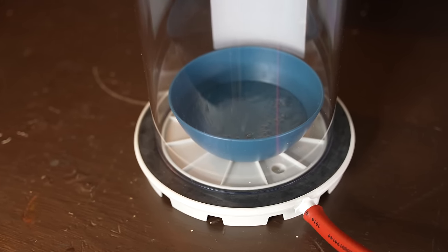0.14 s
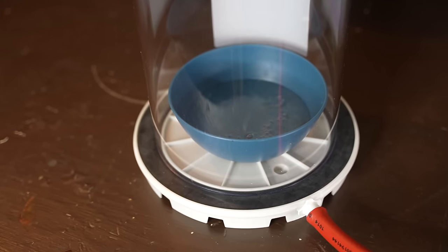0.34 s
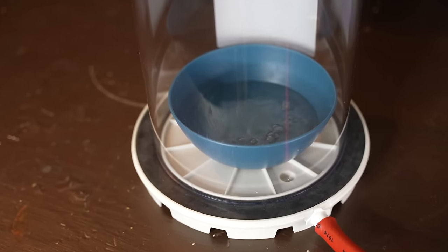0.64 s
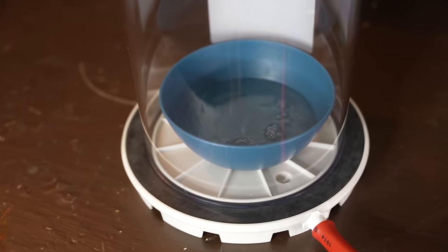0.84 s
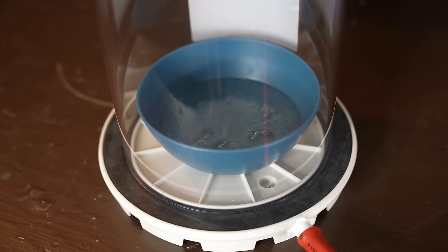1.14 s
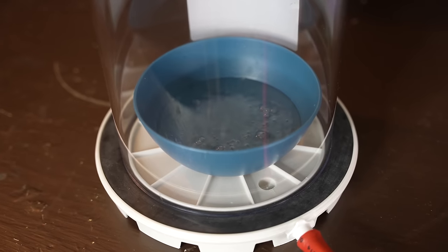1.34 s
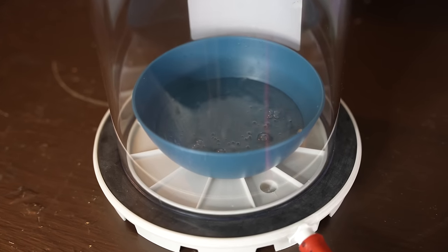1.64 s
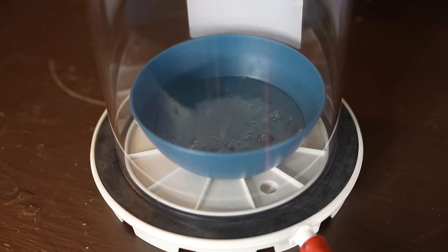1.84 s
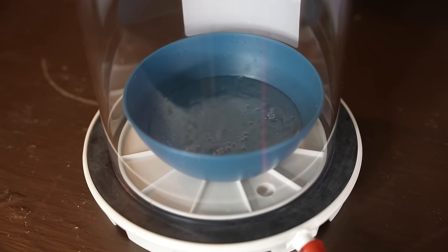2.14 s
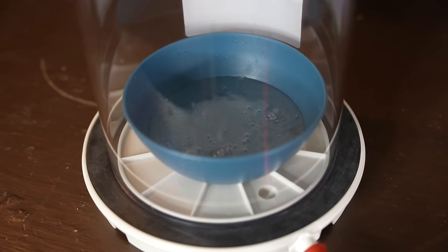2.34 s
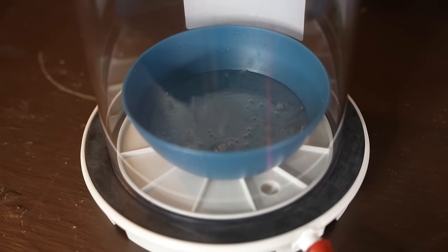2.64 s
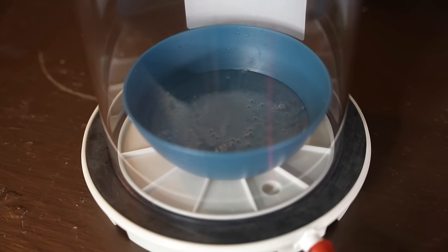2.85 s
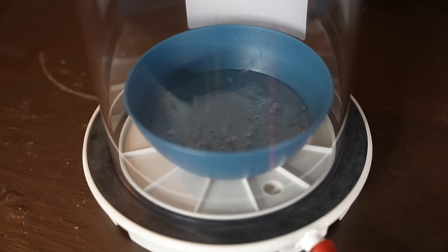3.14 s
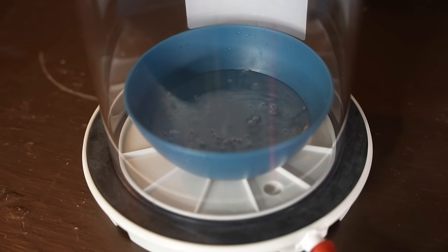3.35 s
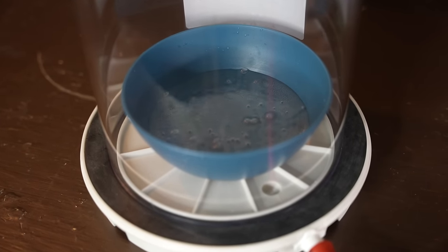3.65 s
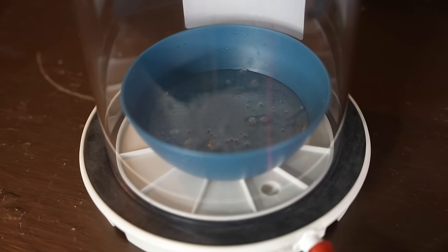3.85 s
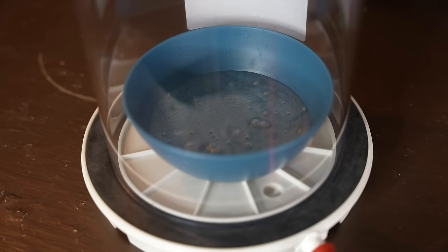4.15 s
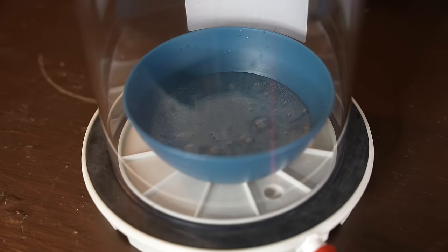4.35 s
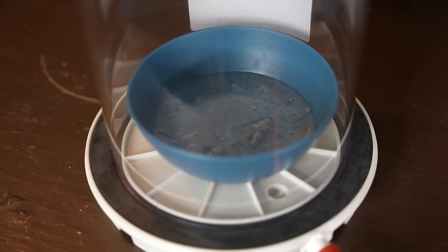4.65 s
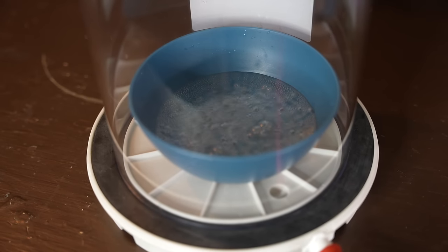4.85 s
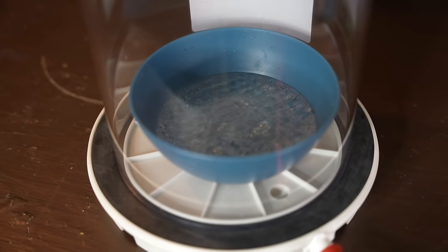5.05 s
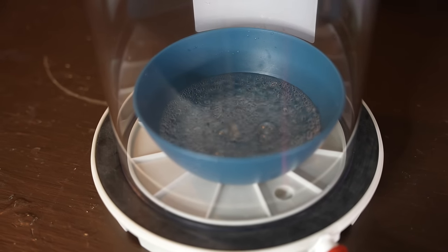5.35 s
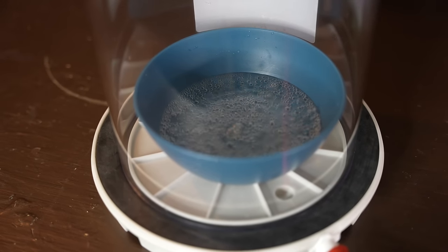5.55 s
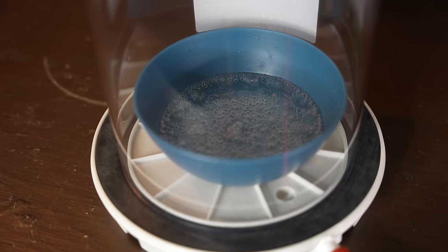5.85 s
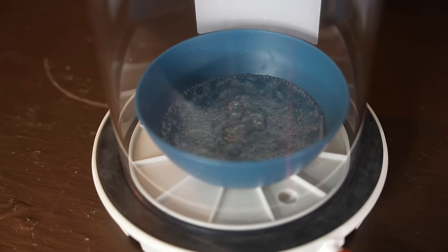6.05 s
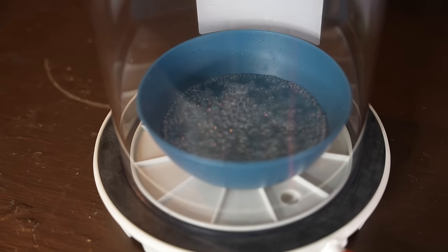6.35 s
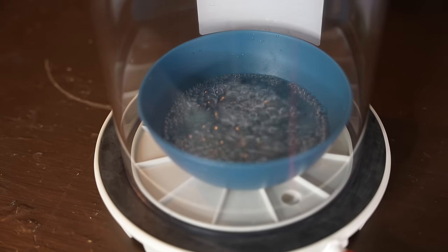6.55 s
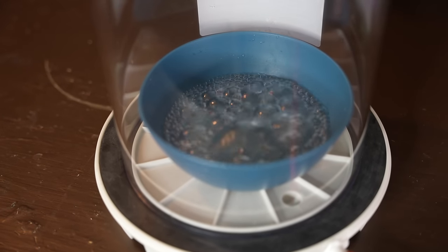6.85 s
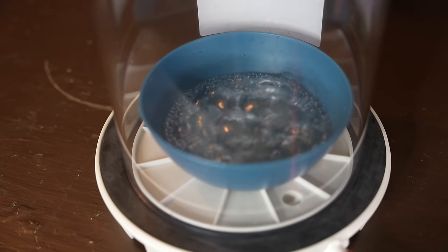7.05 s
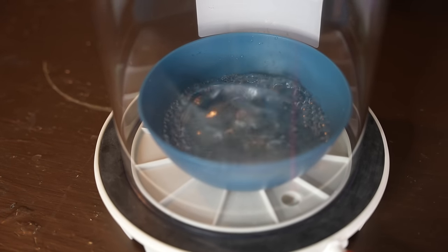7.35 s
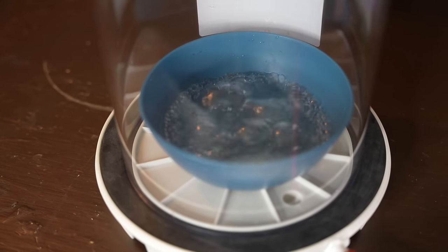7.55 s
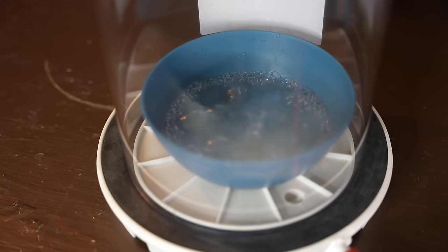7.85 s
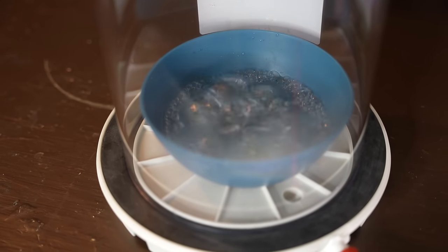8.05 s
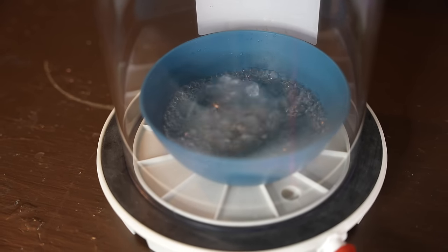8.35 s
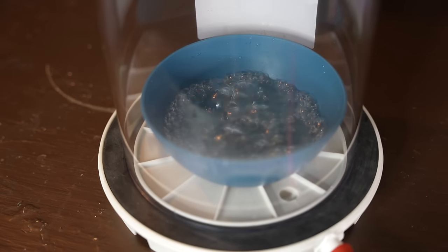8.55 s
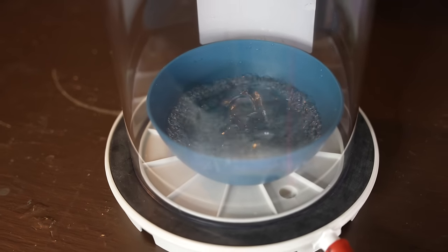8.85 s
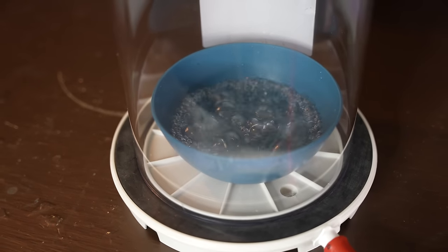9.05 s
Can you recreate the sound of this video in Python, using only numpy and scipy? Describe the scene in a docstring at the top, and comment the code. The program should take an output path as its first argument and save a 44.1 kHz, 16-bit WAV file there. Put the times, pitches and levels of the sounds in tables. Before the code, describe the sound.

A rotary vacuum pump runs continuously on a workbench, close by in a small dry workshop. Its rapid knocks, almost sixty a second, merge into a hard mid-pitched rattle over low hum and oily hiss. Air spits briefly at first; around four seconds the knock strengthens and sharp metallic clacks cluster, then uneven clatter continues to the end.

```python
"""A low hum and a knock, two vane strokes a turn, ring from a rotary vane vacuum pump on a workbench.
The hum is a stack of shaft orders; the knock is oil-cushioned blows through the housing's resonances.
As the bell jar empties the knock grows uneven, and noise-driven steel modes clatter harder on the whole.
Hard valve clacks stand out, air spits as sliding bands of noise, and churned oil hisses underneath."""
import sys
import numpy as np
from scipy import signal
from scipy.fft import rfft, irfft, next_fast_len
from scipy.io import wavfile
from scipy.ndimage import uniform_filter1d, map_coordinates

SR = 44100
rng = np.random.default_rng(int(sys.argv[2]) if len(sys.argv) > 2 else 0)


def transcribe(signal):
    """Save signal, clipped to [-1, 1], as a 16-bit WAV file at the path in sys.argv[1]."""
    frames = np.atleast_2d(signal).T
    limited = np.clip(frames, -1, 1)
    pcm = np.round(limited * 32767).astype(np.int16)
    wavfile.write(sys.argv[1], SR, pcm)


N = 405719  # length [samples]

# Levels are balances inside the mix, ahead of the microphone.
# vane strokes, two a turn: (time [s], rate [Hz])
STROKE_RATE = [(0, 58.42), (1.5, 58.6), (4, 58.64), (9.2, 58.76)]
# how far the jar is emptied: (time [s], vacuum [0-1])
VACUUM_REACHED = [(0, 0), (1, .25), (2.5, .5), (4.2, .8), (6.5, .95), (9.2, 1)]
# shaft and vane orders: (multiple of stroke rate, level moving air [dB], in thin air [dB], near vacuum [dB])
HUM_ORDERS = [(1, -41.5, -41.5, -42.5), (2, -38.5, -44.5, -45), (2.5, -57.5, -52.5, -62),
              (3, -54, -41.5, -40.5), (4, -54.5, -53, -61.5), (5, -43, -58, -52), (5.5, -45, -55, -57),
              (6, -52.5, -43, -51), (6.5, -45, -51, -55), (7, -50, -52, -56), (8, -42.5, -52.5, -60),
              (8.5, -48, -51, -56), (9, -52, -44.5, -46), (9.5, -45, -48, -54), (10, -42, -43.5, -48),
              (11, -41.5, -56, -59), (12.5, -51, -44.5, -51), (13.5, -47, -44.5, -48), (14, -47, -47, -52),
              (14.5, -48, -47, -47)]
# resonances of the pump housing and its panels: (frequency [Hz], width [Hz], level [dB])
HOUSING_MODES = [(965.9, 30.2, 0), (1218.4, 11.9, 4.5), (1029.7, 72, -6.5), (1066, 216, -8),
                 (1101.4, 33, -5.5), (1635, 16, -8.5)]
# resonances of the valve and vane steel: (frequency [Hz], width [Hz], level [dB])
STEEL_MODES = [(2090, 60, -14), (2340, 75, -7), (2500, 60, -8), (2720, 90, -10), (2950, 60, -9.5),
               (3250, 48, -12), (3460, 60, -5.5), (3980, 40, -3.5), (4320, 85, 4.5), (4430, 120, -6),
               (4600, 60, -9), (4870, 70, -12), (5450, 200, -17), (6530, 80, -15), (8600, 150, -12.5),
               (9050, 120, -16), (9450, 80, -13), (10050, 200, -23), (13300, 150, -28)]
# the hardest valve clacks: (time [s], relative peak [dB], treble tilt above 5 kHz [dB])
HARD_CLACKS = [(1.003, -22, -10), (3.988, -12, -5), (4.0711, -14.5, -6), (4.124, -12, -6),
               (4.2955, -11, -3), (4.4278, -12, -7), (4.636, -10, -8), (4.82, -15, -9), (5.127, -14.5, -5),
               (5.297, -18, -2), (5.775, -19, 0), (6.0136, -10.5, 4), (6.27, -29, -9), (6.9504, -12.5, -1),
               (7.375, -21, 4)]
# colour of churned oil and air: (frequency [Hz], relative level [dB])
CHURN_COLOUR = [(25, -42), (150, 0), (300, -5.5), (450, 2.5), (800, 5.5), (1250, 18), (1550, 0),
                (3000, -7.5), (5500, -10), (7300, -11.5), (9800, -8.5), (11500, -17), (15500, -50)]
# colour of each stroke's dull thud: (frequency [Hz], relative level [dB])
THUD_COLOUR = [(100, -0.5), (230, 9), (380, -20), (600, 9), (900, 11), (1350, -25), (1600, -44),
               (3000, -24), (12000, -40)]
# decay of the workshop: (frequency [Hz], t60 [s])
ROOM_DECAY = [(200, .2), (2000, .13), (10000, .12)]
# microphone colour: (frequency [Hz], level [dB])
MIC_COLOUR = [(1250, 0.5), (1450, -6.5), (1700, -2), (5500, -2.5), (7200, -6.5), (8700, -8), (10500, -10.5),
              (13300, -7.5), (15700, -15)]
# resonances of the valve port: (frequency [Hz], width [Hz], level [dB])
PORT_MODES = [(4400, 250, -1), (4950, 220, 0), (5430, 200, 0), (5900, 200, -1), (6530, 90, 1),
              (9480, 200, 10), (13300, 200, -10)]
# knock strength, greatest as the water starts to boil: (time [s], level [dB])
KNOCK_STRENGTH = [(0, -26.7), (3.7, -26.5), (4.4, -23.8), (6.2, -24.8), (8.2, -26), (8.7, -28.2),
                  (9.2, -27)]
# clatter strength between rattles: (time [s], relative level [dB])
CLATTER_STRENGTH = [(0, -45.5), (1, -43.5), (3.8, -41), (4.1, -39.5), (5.7, -40), (6.6, -37), (7.3, -40.5),
                    (9.2, -38.5)]
# the knock falters for a few strokes: (time [s], length [s], depth [dB])
KNOCK_LULLS = [(0.49, 0.028, 9.5), (0.962, 0.036, 6), (1.533, 0.019, 3), (2.01, 0.017, 2), (2.18, 0.03, 2),
               (2.337, 0.015, 0.5), (2.775, 0.04, 2), (3.426, 0.02, 5), (3.926, 0.042, 4.5),
               (4.39, 0.035, 4), (4.779, 0.073, 10), (5.374, 0.022, 13), (5.723, 0.094, 5),
               (6.114, 0.048, 8.5), (6.52, 0.19, 3.5), (7.072, 0.052, 6), (7.267, 0.05, 6),
               (7.566, .025, 4.5), (7.71, 0.064, 11), (8.484, 0.055, 5), (8.759, 0.036, 6.5),
               (8.988, 0.072, 6.5)]
# runs of harder knocks: (time [s], length [s], rise [dB])
KNOCK_SURGES = [(.018, .057, 3.5), (.135, 0.031, 4.5), (1.175, 0.03, 4.5), (1.335, 0.055, 2.5),
                (1.578, 0.03, 5.5), (1.885, 0.062, 4.5), (2.36, 0.082, 3), (2.705, 0.11, 3.5),
                (4.335, 0.074, 2.5), (7.175, 0.072, 3), (7.83, 0.055, 3.5)]
# the valve rattles for a few strokes: (time [s], length [s], rise [dB])
VALVE_RATTLES = [(.025, .055, 6), (.42, 0.024, 7), (.82, 0.046, 5), (1.012, 0.06, 5), (1.55, 0.047, 2.5),
                 (2.065, 0.017, 11), (2.475, 0.016, 6), (2.564, 0.069, 3.5), (2.871, 0.036, 3.5),
                 (2.998, 0.035, 8), (4.324, 0.043, 8), (4.651, 0.051, 8), (4.954, 0.077, 3),
                 (5.154, 0.11, 7), (5.623, 0.035, 7), (5.806, 0.042, 7.5), (6.236, 0.11, 3.5),
                 (6.749, 0.031, 8), (7.005, 0.025, 10), (7.368, 0.064, 10), (7.494, 0.052, 4.5),
                 (7.603, 0.1, 7), (8.137, 0.14, 5), (8.475, 0.028, 10.5), (8.86, 0.068, 5)]
# air spits through the oil: (time [s], length [s], relative level [dB], centre [Hz])
AIR_SPITS = [(0.022, .05, -40, 4970), (0.29, 0.086, -50, 5570), (0.46, 0.087, -46.5, 5200),
             (0.778, 0.047, -41, 5440), (1.008, 0.069, -39.5, 5370), (1.133, 0.053, -38.5, 4700),
             (1.645, 0.026, -38, 5100), (1.712, 0.062, -49, 5700), (1.982, 0.081, -40.5, 5300),
             (2.113, .04, -54, 6560), (2.23, 0.02, -39, 5600), (2.36, 0.055, -46, 5640),
             (2.64, 0.068, -44, 5570), (2.79, 0.05, -45, 5640), (3.096, 0.078, -47, 5800),
             (3.595, 0.028, -45, 5800), (3.76, 0.054, -50, 6130), (4.797, 0.21, -52, 4950),
             (5.793, 0.062, -40, 4930), (6.122, 0.066, -44.5, 5460), (6.706, 0.15, -38.5, 5100),
             (7.294, 0.2, -46, 5300), (7.48, 0.056, -40, 5450), (7.872, 0.069, -41, 4600),
             (8.4, 0.08, -39.5, 5430), (8.513, 0.088, -47, 6040), (8.702, 0.049, -42, 5900),
             (8.817, 0.065, -45, 4600), (9.044, 0.23, -42.5, 4860)]
# colour of fine oil sputter: (frequency [Hz], relative level [dB])
SPUTTER_COLOUR = [(1500, -21), (5800, 5), (7500, -8.5), (9400, -1), (11000, -10.5), (15500, -16)]
# air seeping between spits: (time [s], relative level [dB])
AIR_SEEP = [(0, -49), (3, -48.5), (4.2, -52), (9.2, -63)]

CUSHION_HZ = 1710  # the oil softens each slap above this pitch
TOP_HZ = 15730  # upper band limit
# the knock comes back harder after a lull, by a share of its depth; the clatter shares part of the lull
REBOUND_AFTER_S, REBOUND_S, REBOUND_SHARE, CLATTER_LULL_SHARE = 0.05, 0.033, 0.09, 0.38
# random drift of the two strengths: depth [dB] and rate [random knots a second]
KNOCK_WANDER_DB, KNOCK_WANDER_RATE = 0.78, 35
CLATTER_WANDER_DB, CLATTER_WANDER_RATE = 1.04, 18
SPUTTER_PER_S, SPUTTER_DB = 870, -47  # mean bursts a second; relative level before the air thins


def amp(db):
    """Decibels to gain."""
    return 10 ** (np.asarray(db) / 20)


def unit(x):
    """Scale to rms 1."""
    return x / np.sqrt(np.mean(x ** 2) + 1e-20)


def along(points, hz):
    """(frequency [Hz], value) points read on a log frequency axis."""
    f, v = np.transpose(points)
    return np.interp(np.log(hz + 1), np.log(f + 1), v)


def curves(rows):
    """One value per sample for each column after the time."""
    s, *cols = np.transpose(rows)
    return [np.interp(np.arange(N) / SR, s, c) for c in cols]


def wobble(rate):
    """A smooth random curve, rate knots a second."""
    knots = rng.standard_normal(1024)
    coarse = np.arange(0, N, 64)
    curve = map_coordinates(knots, [coarse * rate / SR], mode="wrap")
    return np.interp(np.arange(N), coarse, curve)


def swells(rows):
    """A rounded hump for each (time [s], length [s], height) row, above half height over its length."""
    t = np.arange(N) / SR
    out = np.zeros(N)
    for s, length, height in rows:
        near = np.abs(t - s) < 2 * length
        out[near] += height * .5 ** (np.abs(2 * (t[near] - s) / length) ** 3)
    return out


def filtered(x, response):
    """x times a complex response of frequency."""
    m = next_fast_len(N + SR // 2)
    return irfft(rfft(x, m) * response(np.fft.rfftfreq(m, 1 / SR)), m)[:N]


def coloured(x, colour):
    """x shaped by a table of levels over frequency."""
    return filtered(x, lambda hz: amp(along(colour, hz)))


def ring(x, modes):
    """x through a body's resonances, neighbours in opposite polarity."""
    def response(f):
        total = 0
        for k, (centre, width, db) in enumerate(modes):
            damping = 1j * f * width
            total = total + (-1) ** k * amp(db) * damping / (centre ** 2 - f ** 2 + damping)
        return total
    return filtered(x, response)


def struck_mode(t, hz, width, phase=0):
    """One resonance dying away after a blow; a wider mode dies sooner."""
    return width * np.exp(-np.pi * width * t) * np.cos(2 * np.pi * hz * t + phase)


def taps(times, sizes):
    """Impulses at the given times."""
    at = np.round(times * SR).astype(int)
    inside = (at >= 0) & (at < N)
    return np.bincount(at[inside], sizes[inside], N)


def scrape(blows, t60):
    """Each blow becomes a dying burst of fine contacts."""
    t = np.arange(SR // 8) / SR
    return signal.fftconvolve(blows, amp(-60 * t / t60))[:N] * rng.standard_normal(N)


def steady(x, size=4500):
    """Level x to about rms 1 over a moving window of size samples."""
    power = np.abs(uniform_filter1d(x ** 2, size))
    return x / np.sqrt(power + 1e-3 * np.mean(x ** 2))


def room(x):
    """The workshop's short tail: decaying noise, dying faster in the treble."""
    hz, t, z = signal.stft(rng.standard_normal(SR // 3), SR, nperseg=256)
    decay = amp(-60 * t / along(ROOM_DECAY, hz)[:, None])
    tail = signal.istft(z * decay, SR, nperseg=256)[1]
    return signal.fftconvolve(x, tail / np.linalg.norm(tail))[:N]


def churn(cycle, clatter_db, vacuum):
    """Oil and air hiss in the casing, swelling with every stroke and rising and falling with the clatter."""
    swell_db = 0.5 * np.cos(2 * np.pi * (cycle - .4)) + 2.9 * wobble(25)
    hiss = unit(coloured(rng.standard_normal(N) * amp(swell_db), CHURN_COLOUR))
    # the hiss leans with the clatter
    lean_db = 0.41 * (clatter_db - np.mean(clatter_db))
    return amp(-34.5 - 2 * vacuum + lean_db) * hiss


def sputter(cycle, vacuum):
    """Tiny oil bubbles burst at the exhaust, in step with the strokes, for as long as air is moving."""
    chance = SPUTTER_PER_S / SR * (1 + np.cos(2 * np.pi * (cycle - .4)))
    bursts = rng.random(N) < chance
    fizz = unit(coloured(bursts * rng.standard_normal(N), SPUTTER_COLOUR))
    return amp(SPUTTER_DB) * (1 - vacuum) * fizz


def spits(strokes):
    """Air spits through the oil at the port, a puff a stroke; the gap changes, so the hiss slides in pitch."""
    s, length, db, centre_hz = np.transpose(AIR_SPITS)
    sizes = amp(2.5 * rng.standard_normal(len(strokes)))
    puffs = scrape(taps(strokes + .003, sizes), t60=.06)
    hz, t, z = signal.stft(ring(puffs, PORT_MODES), SR, nperseg=256)
    flutter_hz = 280 * np.interp(t, np.arange(N) / SR, wobble(35))
    centre = np.interp(t, s, centre_hz) + flutter_hz
    # a sliding band over a faint floor
    gap = np.exp(-((hz[:, None] - centre) / 650) ** 2) + amp(-17)
    hiss = steady(signal.istft(z * gap, nperseg=256)[1][:N], size=2500)
    return hiss * (swells(zip(s, length, amp(db))) + amp(curves(AIR_SEEP)[0]))


def hum(cycle, vacuum):
    """Shaft and vane orders; their balance shifts as the load of air falls away."""
    # the motor's 120 Hz magnetic hum beats slowly against the second vane order
    out = amp(-56) * np.sin(2 * np.pi * 120 * np.arange(N) / SR)
    for multiple, *levels_db in HUM_ORDERS:
        level_db = np.interp(vacuum, [0, .8, 1], levels_db) + 0.18 * multiple * wobble(6)
        # near-aligned phases make the orders swell together once a turn of the shaft
        turns = multiple * (cycle - .25) + .135 * rng.standard_normal()
        out += amp(level_db) * np.cos(2 * np.pi * turns)
    return out


def clacks():
    """The valve snaps hard on its seat: a dying noise burst rings steel modes, recoloured each time."""
    t = np.arange(SR // 8) / SR
    out = np.zeros(N + len(t))
    for s, db, treble_db in HARD_CLACKS:
        steel = np.zeros(len(t))
        for hz, width, mode_db in STEEL_MODES:
            level_db = mode_db + treble_db * (hz > 5000) + rng.normal(0, 3)
            steel += amp(level_db) * struck_mode(t, hz, width, rng.uniform(0, 2 * np.pi))
        force = rng.standard_normal(len(t)) * amp(-60 * t / .045)
        clack = signal.fftconvolve(force, steel)[:len(t)]
        out[round(s * SR):][:len(t)] += amp(db - 7.0) * clack / np.abs(clack).max()
    return out[:N]


def clatter(strokes, vacuum, level_db):
    """The valve shuts just after each stroke; runs of blows favour different steel modes."""
    out = np.zeros(N)
    chance = rng.standard_normal((len(strokes), 4)).T
    times = strokes + .007 + .001 * chance[0]
    t = np.arange(SR // 24) / SR
    for hz, width, db in STEEL_MODES:
        own = rng.standard_normal((len(strokes), 2)).T
        favour = unit(uniform_filter1d(own[0], size=3))
        blows = taps(times + .0006 * own[1], amp(2.6 * chance[1] + 2 * favour))
        # each blow fades over a 4 ms time constant, roughened by noise
        force = signal.lfilter([1], [1, -np.exp(-1 / (.004 * SR))], blows)
        rough = force * rng.standard_normal(N)
        out += amp(db) * signal.oaconvolve(rough, struck_mode(t, hz, width))[:N]
    # the vane tips tick past the port in near-strict time
    tips = taps(strokes + .0045 + .00002 * chance[2], amp(1.5 * chance[3]))
    ticks = unit(ring(tips, STEEL_MODES))
    mix = unit(out) + amp(-3 - 8 * vacuum) * ticks
    return amp(level_db + 1.44) * steady(mix, size=7000)


def levels():
    """Knock and clatter in dB: both falter in a lull; the knock then rebounds, the valve rattles in fits."""
    lull_db = swells(KNOCK_LULLS)
    rebounds = [(s + length / 2 + REBOUND_AFTER_S, REBOUND_S, REBOUND_SHARE * db)
                for s, length, db in KNOCK_LULLS]
    knock_db = curves(KNOCK_STRENGTH)[0] - lull_db + swells(rebounds) + swells(KNOCK_SURGES)
    knock_db += KNOCK_WANDER_DB * wobble(KNOCK_WANDER_RATE)
    clatter_db = curves(CLATTER_STRENGTH)[0] - CLATTER_LULL_SHARE * lull_db + swells(VALVE_RATTLES)
    clatter_db += CLATTER_WANDER_DB * wobble(CLATTER_WANDER_RATE)
    return knock_db, clatter_db


def knock(strokes, thin, level_db):
    """Each vane slaps oil against the outlet twice; with less air the slap comes later and less evenly."""
    chance = rng.standard_normal((len(strokes), 4)).T
    jitter = (.00004 + .00011 * np.sqrt(thin)) * chance[0]
    times = strokes + .0003 + .002 * thin + jitter
    # the two opposed vanes rock the housing in turn, one way and back
    sizes = (-1) ** np.arange(len(strokes)) * amp(1.4 * chance[1])
    blows = taps(times, sizes)
    second_times = times + .00478 + .0001 * thin * (1 + chance[2])
    second_sizes = (.52 - .14 * thin) * sizes * amp(2 * chance[3])
    slaps = blows + taps(second_times, second_sizes)

    def bounces(hz):
        return sum(.75 ** k * np.exp(-2j * np.pi * hz * .00102 * k) for k in range(4))
    # the vane bounces a few times, a millisecond apart, in step with the housing
    chatter = filtered(slaps, bounces)
    cushioned = filtered(chatter, lambda hz: 1 / (1 + (hz / CUSHION_HZ) ** 12))
    housing = unit(ring(cushioned, HOUSING_MODES))
    # the oil film spreads each blow into a soft, rough push
    push = unit(blows) + unit(scrape(np.abs(blows), t60=0.0051))
    thud = unit(coloured(push, THUD_COLOUR))
    # each stroke keeps its own strength until the next one strikes
    stroke = np.searchsorted(times[1:], np.arange(N) / SR)
    force = amp(np.interp(times + .007, np.arange(N) / SR, level_db))
    strength = uniform_filter1d(force[stroke], size=90)
    return strength * steady(housing + amp(-23.5) * thud, size=2500)


def scene():
    """One rotor times the knock, clatter, puffs, sputter, hum and churn; the clacks keep their own times."""
    cycle = np.cumsum(curves(STROKE_RATE)[0]) / SR - .1
    strokes = np.interp(np.arange(int(cycle[-1]) + 1), cycle, np.arange(N) / SR)
    vacuum = np.clip(curves(VACUUM_REACHED)[0], 0, 1)
    thin = np.interp(strokes, np.arange(N) / SR, vacuum)
    knock_db, clatter_db = levels()
    knocks = knock(strokes, thin, knock_db)
    steel = clatter(strokes, vacuum, clatter_db) + clacks()
    bright = steel + spits(strokes) + sputter(cycle, vacuum)
    # the treble is shadowed, so part of it arrives by way of the bench and walls
    direct = knocks + amp(-1.2) * bright
    echo = room(amp(-17) * knocks + amp(-6) * bright)
    return (direct + echo + hum(cycle, vacuum) + churn(cycle, clatter_db, vacuum))[None]


def record(dry):
    """The microphone dulls the top; nothing passes above the band limit."""
    return filtered(dry[0], lambda hz: amp(along(MIC_COLOUR, hz)) * (hz < TOP_HZ))[None]


dry = scene()
out = record(dry)
transcribe(out)
```